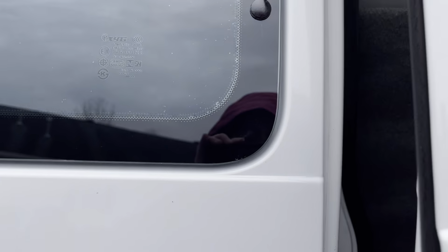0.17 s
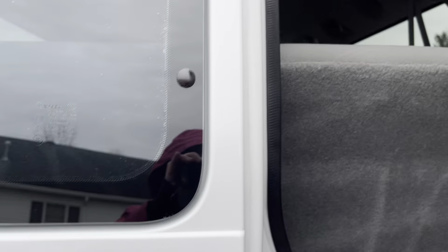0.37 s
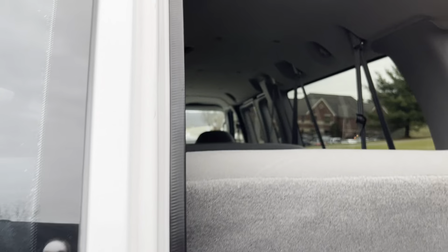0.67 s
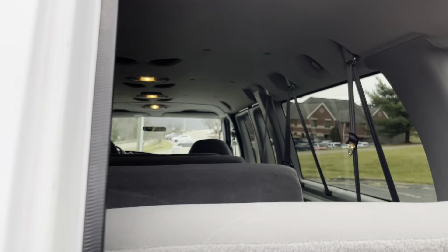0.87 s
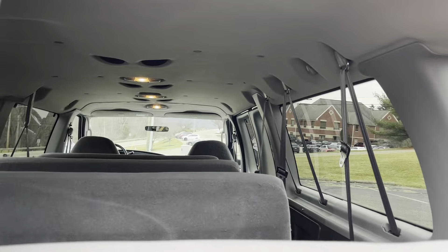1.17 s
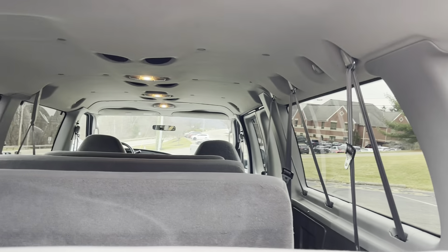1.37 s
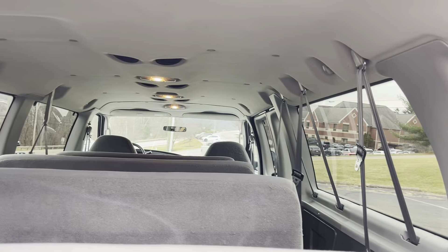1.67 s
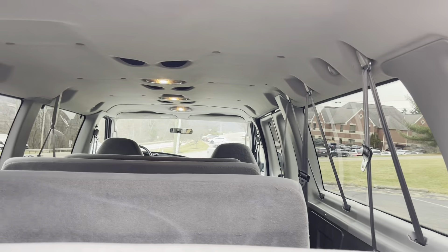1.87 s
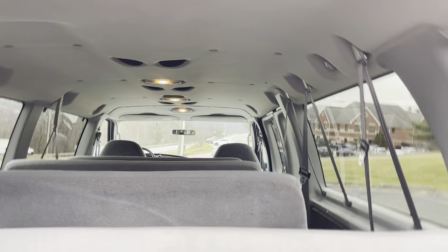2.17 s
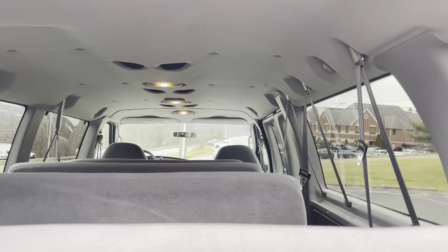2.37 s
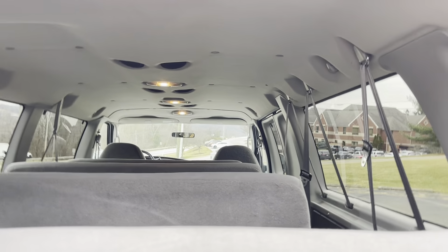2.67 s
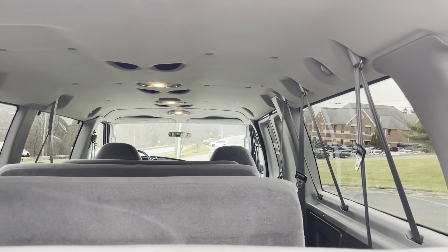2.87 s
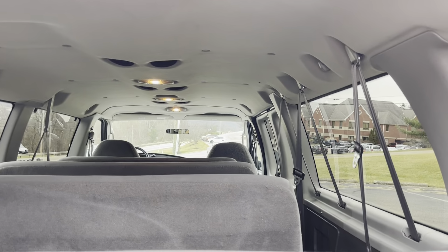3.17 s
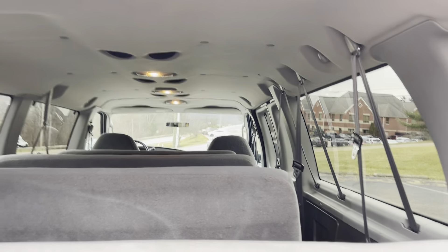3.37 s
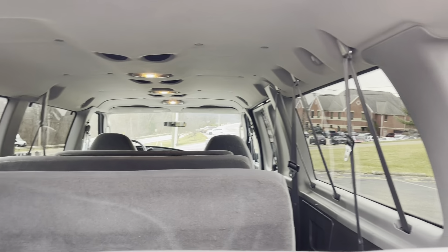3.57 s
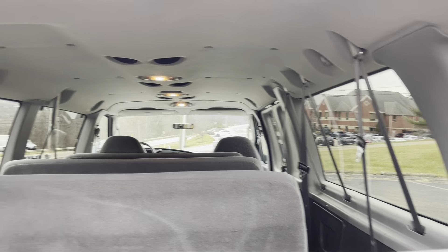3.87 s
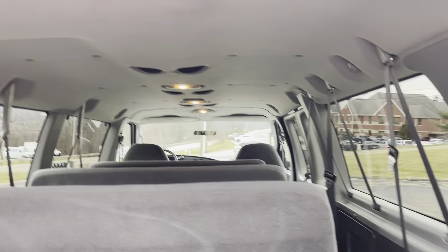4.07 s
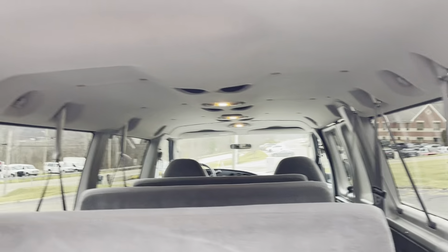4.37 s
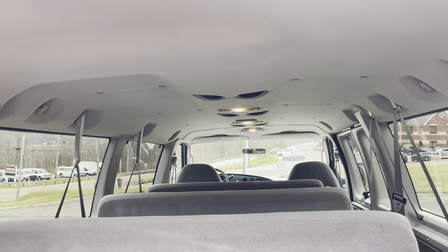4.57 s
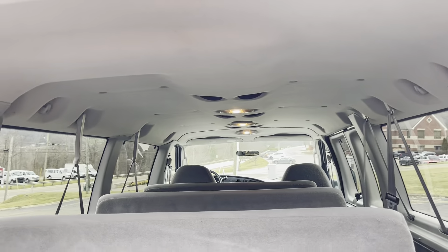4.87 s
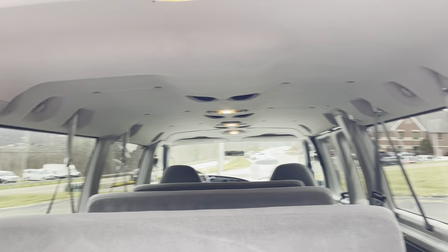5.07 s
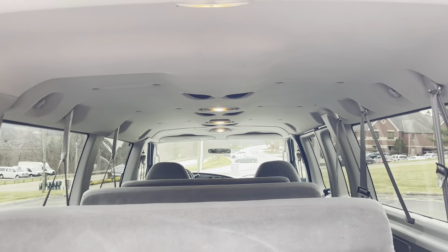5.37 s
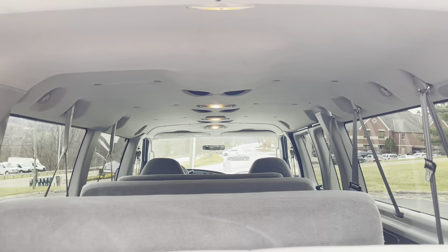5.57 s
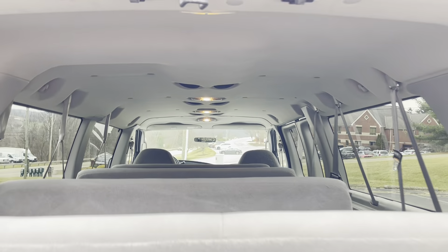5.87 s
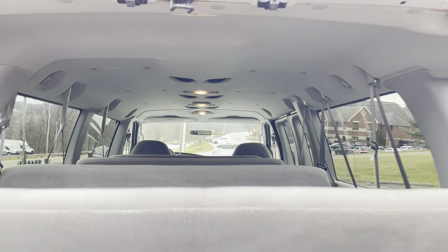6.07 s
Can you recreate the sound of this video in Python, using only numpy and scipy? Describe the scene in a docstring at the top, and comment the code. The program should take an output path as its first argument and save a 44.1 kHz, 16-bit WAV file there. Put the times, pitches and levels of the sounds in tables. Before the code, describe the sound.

A close, hand-held stereo microphone outdoors in a car park. At 0 s a dull knock with a burst of low rumble starts abruptly, over airy hiss and faint traffic. Around 0.5 s a tight cluster of hard latch blows sets the first van door booming and ringing, hollow and heavy. The hiss fades by about 1.2 s; at 1.33 s comes another strong, bright knock with a low thump. Soft scrapes and rubbing follow around 2.0 to 2.4 s, small taps near 2.6 s, and the rumble almost vanishes at 2.95 s. Tiny ticks lead to a knock at 3.3 s and a sharp, bright metallic clack at 3.46 s from the second door. Lighter bumps come near 4.0, 4.4 and 5.1 to 5.3 s, with clothes rustling. From 4.5 s a distant car's tyre hum swells and sinks in pitch, with faint taps to the end at 6.2 s.

```python
"""Two heavy rear doors of a van are unlatched and swung open in a car park, heard by a hand-held microphone pair.
First, knocks and a hard latch set the first door booming and ringing, under an airy hiss and a low rumble.
The rumble is nearly silent around 2.95 s; the second door follows, with a bright latch clack near 3.5 s.
Lighter knocks, thumps and scrapes come after, and from 4.5 s a far car's tyre note grows and sinks.
Clothes rustle and traffic hums behind. Blows are dying sine tones and noise; the rest is mostly shaped noise."""
import sys
import numpy as np
from scipy import signal
from scipy.io import wavfile

SR = 44100
rng = np.random.default_rng(int(sys.argv[2]) if len(sys.argv) > 2 else 0)


def transcribe(signal):
    """Save signal, clipped to [-1, 1], as a 16-bit WAV file at the path in sys.argv[1]."""
    frames = np.atleast_2d(signal).T
    limited = np.clip(frames, -1, 1)
    pcm = np.round(limited * 32767).astype(np.int16)
    wavfile.write(sys.argv[1], SR, pcm)


N = 274875

# Far traffic spectrum: pitch_hz, relative level_db (per Hz)
TRAFFIC_SPECTRUM = [(350, -34.5), (600, -15), (774, -4.5), (1010, -4), (1210, -9), (1620, -2), (2330, -12),
                    (3050, -20), (4000, -15.5), (5200, -53.5), (8800, -120)]
# Far traffic, more or less screened by doors and body: time_s, level_db
TRAFFIC_LEVEL = [(0, -56.5), (.42, -55.5), (1.04, -58.5), (1.4, -60), (1.72, -67), (2.19, -58.5),
                 (2.44, -63), (2.58, -59.5), (2.83, -64), (3.1, -78), (3.45, -64.5), (4, -62), (4.9, -63),
                 (5.4, -59), (6.23, -61)]
# Two humps where tyre roar stands out: pitch_hz, width_hz, added_db
TYRE_HUMPS = [(974, 103, -9), (1720, 170, -14)]
# A far car rolls by: time_s, level_db
CAR_LEVEL = [(4.5, -82.5), (4.8, -61.5), (5.2, -60.5), (5.7, -59), (6.23, -56)]
# Its tyre note coming, then going: pitch_hz, width_hz (of each of two filter passes)
CAR_NOTES = [(1050, 210), (910, 150)]

# Door and grip rumble spectrum: pitch_hz, relative level_db (per Hz)
RUMBLE_SPECTRUM = [(15, -45), (25, -21.5), (49, -1), (103, 0.5), (123, 1.5), (146, -12.5), (331, -20.5),
                   (470, -36), (500, -16), (650, -56), (1100, -120)]
# Low handling rumble of doors and grip, nearly silent around 2.95 s: time_s, level_db
RUMBLE_LEVEL = [(0, -12.5), (.05, -34), (.42, -48.5), (.6, -35), (.7, -39), (.88, -44), (1.04, -41.5),
                (1.37, -47.5), (1.8, -50), (2.2, -45.5), (2.58, -47), (2.83, -52.5), (2.95, -88),
                (3.16, -60), (3.36, -45.5), (3.5, -36.5), (3.8, -49), (4.23, -46), (4.5, -52), (4.94, -52),
                (5.12, -47.5), (5.3, -44), (5.4, -45.5), (5.52, -48.5), (6.23, -49.5)]
# Gain of the deepest rumble, which drops at 4.4 s and partly returns: time_s, gain_db
DEEP_GAIN = [(0, 4.5), (4.3, 1.5), (4.45, -24), (5.0, -13.5), (5.3, -5.5), (5.6, -13), (5.95, -2),
             (6.23, 0.5)]
# Panel murmur spectrum: pitch_hz, relative level_db (per Hz)
MURMUR_SPECTRUM = [(110, -31), (180, -0.5), (270, -4), (456, -11), (491, -13), (771, -16.5), (900, -11),
                   (1170, -50), (1980, -120)]
# Murmur of the panels as a door is moved: top_s, level_db, half_length_s
MURMUR_SWELLS = [(0, -27.5, 0.034), (.36, -48.5, 0.2), (1.04, -42.5, 0.067), (1.57, -44.5, 0.11),
                 (2.12, -52.5, 0.085), (2.58, -59.5, 0.067), (3.53, -42.5, .12), (3.99, -46, 0.16),
                 (4.6, -59, 0.3), (5.22, -57, 0.19)]
# Clothes rustle spectrum: pitch_hz, relative level_db (per Hz)
RUSTLE_SPECTRUM = [(1290, -23), (2200, -4.5), (2500, -13), (3590, -8.5), (6070, -8), (8600, -5), (10400, 2),
                   (11400, -10), (11800, -14), (12200, -60.5), (12900, -59), (16800, -89), (22000, -120)]
# Clothes rustle with each gesture: top_s, level_db, half_length_s
RUSTLE_SWELLS = [(.2, -57, 0.36), (.8, -66, 0.27), (1.51, -74.5, 0.12), (1.85, -73, 0.11),
                 (2.19, -58.5, 0.19), (2.8, -64, 0.42), (3.63, -64, .12), (4.1, -67, 0.48),
                 (4.62, -60, 0.18), (5.22, -70.5, 0.07), (5.52, -68.5, 0.063), (6.07, -71.5, 0.21)]
RUSTLE_REST_DB = -75
# Stereo width of the background: pitch_hz, side_minus_mid_db
BACKGROUND_WIDTH = [(60, -8.5), (110, -14), (200, -9), (360, -3), (640, 2), (1160, 5), (2110, -1.5),
                    (3810, -1), (6890, -3.5), (12500, -7)]

# Airy hiss of the swinging first door: time_s, level_db
SWING_HISS_LEVEL = [(0.0, -49), (0.068, -50), (0.224, -59.5), (0.748, -59.5), (1.024, -67), (1.158, -76),
                    (1.3, -82)]
SWING_HZ, SWING_WIDTH_HZ = 1950, 300   # width of each of two filter passes
# Scrapes of strap, seal and sleeve, and a buzzing trim:
# start_s, length_s, pitch_hz, width_hz (of each of two filter passes), level_db
SCRAPES = [(0.833, 0.13, 5950, 2550, -56.5), (1.536, 0.14, 1900, 1540, -58), (2.042, 0.23, 620, 300, -53),
           (2.08, 0.088, 2850, 500, -50), (2.178, 0.21, 2250, 1500, -56.5), (2.467, 0.067, 764, 300, -54),
           (2.723, 0.031, 2160, 1194, -56), (3.472, 0.11, 8960, 804, -56), (3.991, 0.042, 1920, 2470, -52),
           (4.638, 0.025, 1683, 860, -52), (5.263, 0.06, 756, 490, -46.5), (5.357, 0.019, 6940, 4000, -61),
           (5.385, 0.01, 6600, 905, -64)]
# Soft thumps of hand and door weight: start_s, pitch_hz, level_db, length_ms
THUMPS = [(0.444, 63.5, -25.5, 32), (0.856, 75, -27.5, 33), (1.385, 175, -18, 18.6), (1.422, 130, -26, 28),
          (1.47, 119, -23.5, 11), (2.234, 76.5, -30, 44), (2.262, 92, -33, 75), (2.32, 61.4, -30, 75),
          (3.412, 262, -34.5, 24), (3.88, 67.3, -36, 43), (4.277, 115, -28.5, 23), (4.39, 97, -27.5, 24),
          (5.039, 127, -45, 110), (5.117, 109, -28.5, 35), (5.151, 147, -29.5, 44), (5.215, 107, -34, 37),
          (5.524, 161, -40, 42)]

# Knocks on the doors: start_s, body_db (at 850 Hz), hardness_db_per_octave, boom_db, boom_hz,
# note_db (of the struck part), note_hz, ring_length_factor
KNOCKS = [(0.001, -22, -6, -20.5, 66.6, -27, 793, 1), (0.056, -32.5, -5.5, -36, 198.4, -27, 616, 1),
          (0.388, -39.5, -8, -40, 268, -43, 624, 0.44), (0.497, -25.5, -0.5, -36, 61, -21, 1180, 1),
          (0.506, -15.5, 1.5, -35, 196, -15, 990, 0.81), (0.511, -13, 1, -21, 191, -9, 765, 0.83),
          (0.518, -10.5, -3, -4, 155, -8, 790, 0.49), (0.531, -20, -0.5, -9.5, 122.4, -19, 600, 1),
          (0.655, -40.5, -4.5, -31, 175, -42, 726, 0.79), (0.843, -39.5, -6.5, -36, 101, -32, 620, 0.97),
          (0.903, -39.5, -4, -43, 233, -32, 705, 0.86), (1.118, -45.5, -8, -29.5, 171, -35, 830, 1),
          (1.154, -39, -8, -27, 97.5, -51, 593, 0.48), (1.333, -10.5, 0.95, -11.5, 160.5, -14, 990, 0.56),
          (1.341, -21, -10, -26, 205, -7, 512, 0.38), (1.367, -27.5, -6.5, -22.5, 179, -27, 537, 0.59),
          (1.404, -34.5, -5.5, -21.5, 124, -40, 725, 0.86), (2.037, -53, -9, -43, 81.5, -44, 615, 0.82),
          (2.096, -54.5, 4, -59, 128, -49, 540, .98), (2.159, -41, -3, -74, 105, -38, 586, 0.48),
          (2.577, -44, -0.5, -29, 120, -34, 515, 0.36), (2.619, -38, 1.5, -19.5, 264, -11.5, 820, 0.21),
          (2.631, -49, 2.5, -27, 72, -26, 730, 0.31), (2.709, -57.5, 1, -45, 93.5, -51, 756, .97),
          (3.07, -62, 4.5, -59.5, 254, -37.5, 2400, 1), (3.196, -55.5, 1.5, -37.5, 64.6, -45, 1760, .56),
          (3.257, -53, 4.5, -48, 72.7, -31, 3420, 0.79), (3.285, -56.5, 10, -51, 56.5, -36, 3140, 0.41),
          (3.296, -33, 2.5, -22, 262, -22, 770, 0.48), (3.443, -34.5, 2.9, -22, 225, -31, 700, .83),
          (3.455, -9.5, 0.5, -46, 256, 2.5, 3080, 0.66), (3.465, -23, -7, -52.5, 116, -10, 613.5, 0.91),
          (3.979, -43, 0, -41, 174, -37, 664, 1), (4.023, -34.5, 1, -27, 156, -28, 560, 0.65),
          (4.121, -51, -4, -46, 85, -41, 645, 0.89), (4.354, -45, -9, -20, 153, -37, 500, 0.52),
          (4.376, -48, -5.5, -18.5, 167, -39.5, 510, 0.57), (4.636, -44.5, -5, -37, 118, -38.5, 670, 1),
          (4.943, -51.5, -3.5, -39, 233, -52, 1136, .62), (5.094, -33.5, -8, -20.5, 221, -21.5, 501, 0.54),
          (5.106, -32.5, -6, -20, 112.4, -26.5, 576, 0.64), (5.243, -42, -4, -36, 258, -33, 584, 0.91),
          (5.292, -41.5, -5.5, -25.5, 144, -30, 510, 0.66), (5.558, -52, -0.6, -35, 177, -59, 1080, 1),
          (5.819, -49.5, -8, -71.5, 113.5, -48.5, 1020, 0.74), (6.024, -51, 0, -46, 99, -25.5, 1650, 0.41),
          (6.195, -53.5, 1.6, -52, 104, -46, 850, 0.91)]
# Centres of boom, thud, clunk, clack and click: pitch_hz
PARTS_HZ = [100, 320, 850, 2400, 7000]
# Thud, clunk, clack and click of a knock of hardness 0, against its body: level_db
KNOCK_COLOUR = [-0.95, 2, 0.56, -1.7]
# Distinct ringing tones (modes) of each door: pitch_hz, relative level_db, time_to_fall_60_db_s
FIRST_DOOR = [(71.5, -7.5, 0.12), (143, -8, 0.7), (173.5, -3, 0.31), (208.4, -2, 0.28), (244.4, -6.5, 0.3),
              (332, -0.5, 0.11), (333.4, -5.5, 0.18), (423.5, -8, 0.39), (527, -19.5, 0.23),
              (602, -15, 0.29), (811, -10.5, .45), (865, -16.5, 0.56), (1144, -9, 0.056),
              (1220, -11.5, 0.15), (1640, -23, .1), (1877, -14, 0.21), (2060, -7, .1), (2220, -21.5, .1),
              (2640, -32.5, 0.092), (4740, -11.5, .08), (5780, -19, 0.12)]
SECOND_DOOR = [(73.7, -11.5, 0.17), (207.8, -8.5, 0.37), (249, -3, 0.29), (360.2, -3, .35),
               (428.7, -19, 0.84), (618.6, -3, 0.18), (736, -21.5, .2), (906, -25, .15), (1123, -8, 0.08),
               (1270, -21, 0.14), (1776, -2, 0.052), (2082, 1.5, 0.067), (3207, -12.5, 0.047),
               (3460, -1.5, 0.036), (3710, -8, 0.092)]
SECOND_DOOR_FROM_S = 2.9
# Crowded modes of the panels, heard as dying noise: pitch_hz, relative level_db, time_to_fall_60_db_s
PANELS = [(45, -19.5, 0.25), (90, -13, 0.14), (185, 1.5, 0.22), (401, -3.5, 0.27), (970, 1, 0.12),
          (2530, -1.5, 0.064), (5000, -0.5, 0.048), (8900, 3.5, 0.036), (11760, -1.5, 0.036)]
# Share of panel noise that differs between the channels: pitch_hz, level_db
KNOCK_WIDTH = [(60, -11), (300, -16), (1000, -3.5), (3000, -1), (8000, -5.5), (12000, -2)]
# Left and right balance of the knocks: pitch_hz, left_minus_right_db
KNOCK_BALANCE = [(60, 1.5), (110, 3), (200, 3), (360, 4), (640, 2.5), (1160, 5.5), (2110, 5), (3810, 7),
                 (6890, 7.5), (12500, -5.5)]
# Where the worked door is: time_s, left_delay_ms (against the right), left_minus_right_db
BEARING = [(0, -0.05, -1.5), (.45, 0.4, -2), (2.7, 0.23, -1.7), (3.2, -0.24, -1.9), (4.5, -0.53, -0.5),
           (6.23, -0.39, -6)]
CONTACT_MS = 1.3
# A strong hard blow is a latch snap: its mids stand out because thud and click are cut.
# Cut in dB per dB of strength above SNAP_FROM_DB, times a hardness weight of 0 to 2
SNAP_FROM_DB, SNAP_THUD_CUT, SNAP_CLICK_CUT = -31, .25, 0.13

PORT_NOTCH_HZ, PORT_NOTCH_WIDTH_HZ = 10100, 830
LOW_CUT_HZ, CUTOFF_HZ = 42.2, 13200
# Edges of half-octave noise bands, in Hz
EDGES = 28 * 2 ** np.arange(0, 9.1, .5)


def amp(db):
    """Turn decibels into a gain."""
    return 10 ** (np.asarray(db) / 20)


def rms_one(x):
    """Scale a sound to an average (rms) strength of 1."""
    return x / np.sqrt(np.mean(x ** 2) + 1e-20)


def in_time(rows, s):
    """Read the columns of a time curve at times s."""
    at, *columns = np.transpose(rows)
    return [np.interp(s, at, column) for column in columns]


def at_hz(points, hz, axis=1):
    """Read a spectrum column, with pitch spaced by octaves as we hear it."""
    points = np.array(points)
    return np.interp(np.log(hz), np.log(points[:, 0]), points[:, axis])


def drift(rate):
    """Wander slowly by chance, with spread 1: smoothed noise, faster for a higher rate."""
    r = np.exp(-80 * np.pi * rate / SR)
    noise = rng.standard_normal(N // 40 + 2002)   # one value per 40 samples
    slow = signal.lfilter([1], [1, -2 * r, r * r], noise)[2000:]
    return np.interp(np.arange(N) / 40, np.arange(len(slow)), rms_one(slow))


def noise_bands():
    """Split unrelated noise pairs into half-octave bands of equal power per Hz; give centres and bands."""
    white = rng.standard_normal((2, 2, N + 4000))
    bands = []
    for k, (low, high) in enumerate(zip(EDGES, EDGES[1:])):
        band_filter = signal.butter(2, [low, high], "band", fs=SR, output="sos")
        # neighbouring bands use different noise
        bands.append(signal.sosfilt(band_filter, white[k % 2])[:, 4000:])
    return np.sqrt(EDGES[:-1] * EDGES[1:]), bands


def resonate_twice(x, hz, width_hz):
    """Pass a sound twice through one resonance, which favours pitches near hz."""
    peak = signal.iirpeak(hz, hz / width_hz, SR)
    return signal.lfilter(*peak, signal.lfilter(*peak, x))


def background(spectrum, level_db, patchy_db, flicker_rate):
    """Make patchy stereo noise whose bands swell partly together and partly alone."""
    out, together = 0, drift(flicker_rate)
    for hz, (mid, side) in zip(*noise_bands()):
        if spectrum[0][0] < hz < spectrum[-1][0]:
            flicker_db = patchy_db * (0.9 * together + drift(flicker_rate))
            gain = amp(at_hz(spectrum, hz) + flicker_db)
            out = out + gain * (mid + amp(at_hz(BACKGROUND_WIDTH, hz)) * side * [[1], [-1]])
    return amp(level_db) * out / np.sqrt(np.mean(out.mean(axis=0) ** 2))


def swells(rows, rest_db):
    """Give levels in dB: a rest level plus rounded swells, each 12 dB down a half length from its top."""
    t = np.arange(N) / SR
    tops = sum(amp(db - 12 * ((t - s) / half_s) ** 2) for s, db, half_s in rows)
    return 20 * np.log10(amp(rest_db) + tops)


def traffic_level_db():
    """Read the far traffic level over time."""
    return in_time(TRAFFIC_LEVEL, np.arange(N) / SR)[0]


def far_traffic():
    """Far traffic is wide noise, with two humps where tyre roar stands out."""
    roar = background(TRAFFIC_SPECTRUM, traffic_level_db(), patchy_db=2.16, flicker_rate=7.1)
    humps = sum(amp(db) * signal.lfilter(*signal.iirpeak(hz, hz / width_hz, SR), roar)
                for hz, width_hz, db in TYRE_HUMPS)
    return roar + humps


def passing_car():
    """Tyre noise sinks in pitch as a higher narrow band gives way to a lower one."""
    t = np.arange(N) / SR
    coming, going = [rms_one(resonate_twice(rng.standard_normal((2, N)), hz, width_hz))
                     for hz, width_hz in CAR_NOTES]
    passed = np.clip((t - 5.2) / 1.23, 0, 1)
    level_db, = in_time(CAR_LEVEL, t)
    return amp(level_db) * (np.sqrt(1 - passed) * coming + np.sqrt(passed) * going)


def handling_rumble():
    """Doors and grip rumble as low noise, whose deepest part has a gain curve of its own."""
    t = np.arange(N) / SR
    level_db, = in_time(RUMBLE_LEVEL, t)
    rumble = background(RUMBLE_SPECTRUM, level_db, patchy_db=2.3, flicker_rate=14.0)
    deep = signal.sosfiltfilt(signal.butter(2, 62.0, fs=SR, output="sos"), rumble)
    deep_gain_db, = in_time(DEEP_GAIN, t)
    return rumble + (amp(deep_gain_db) - 1) * deep


def panel_murmur():
    """Moved panels murmur as noise that swells above a rest level equal to the traffic's."""
    level_db = swells(MURMUR_SWELLS, traffic_level_db())
    return background(MURMUR_SPECTRUM, level_db, patchy_db=2.0, flicker_rate=35.0)


def clothes_rustle():
    """Rubbing cloth makes bright, flickering noise that swells with each gesture."""
    level_db = swells(RUSTLE_SWELLS, RUSTLE_REST_DB)
    return background(RUSTLE_SPECTRUM, level_db, patchy_db=1.23, flicker_rate=21.0)


def swing_hiss():
    """The swinging door hisses: air noise passed twice through one resonance."""
    air = resonate_twice(rng.standard_normal((2, N)), SWING_HZ, SWING_WIDTH_HZ)
    level_db, = in_time(SWING_HISS_LEVEL + [(1.7, -100)], np.arange(N) / SR)
    # each channel also hears some of the other
    return amp(level_db + 1.5 * drift(18.0)) * rms_one(air + 0.54 * air[::-1])


def scrapes(grains_per_s=3500.0):
    """Rubbing makes many uneven grains, coloured by one resonance; it starts fast and fades slower."""
    out = np.zeros((2, N))
    grains = (rng.random((2, N)) < grains_per_s / SR) * rng.standard_normal((2, N)) + 1e-18
    for s, length_s, hz, width_hz, level_db in SCRAPES:
        at, size = round(s * SR), round(length_s * SR)
        rubbed = resonate_twice(grains[:, at:at + size], hz, width_hz)
        stroke = np.sin(np.pi * np.linspace(0, 1, size) ** 0.55)
        out[:, at:at + size] += amp(level_db) * stroke * rms_one(rubbed + 0.23 * rubbed[::-1])
    return out * amp([[1.2], [-1.2]])   # dB, left and right


def thumps():
    """Soft weight gives a few low cycles that swell and fade, stronger on the left."""
    out = np.zeros(N)
    for s, hz, level_db, length_ms in THUMPS:
        t = np.arange(int(length_ms / 1000 * SR)) / SR
        swell = np.sin(np.pi * (t / t[-1]) ** 0.63) ** 1.9
        out[round(s * SR):][:len(t)] += amp(level_db) * swell * np.sin(2 * np.pi * hz * t)
    return out * amp([[1.6], [-1.6]])   # dB, left and right


def struck(t, hz, t60, contact_ms, tail_db=-20.0):
    """A blow builds over the contact and a share of a cycle, drops fast, and leaves a fainter, longer tail."""
    rise = 1 - np.exp(-t / (max(contact_ms, .05) / 1000 + 0.2 / hz))
    return rise * (amp(-60 * t / t60) + amp(tail_db - 60 * t / (4.6 * t60)))


def knock_colour(body_db, hardness, low_db):
    """A harder blow is brighter; give the level of each part from boom to click."""
    octaves = np.log2(np.array(PARTS_HZ[1:]) / PARTS_HZ[2])
    upper_db = body_db + hardness * octaves + KNOCK_COLOUR
    snap_db = max(body_db - SNAP_FROM_DB, 0) * np.clip(hardness + 2, 0, 2)
    upper_db = upper_db - snap_db * np.array([SNAP_THUD_CUT, 0, 0, SNAP_CLICK_CUT])
    return list(zip(PARTS_HZ, [low_db, *upper_db]))


def knocks(modes_db=-1.75, panels_db=-8.0, boom_db=-2.5, boom_cycles=23.0, note_cycles=35.0, shake=0.18):
    """Each knock rings its own boom and note, the door's modes and the panels; lows reach the ports apart in time."""
    size = SR * 3 // 5
    t, out = np.arange(size) / SR, np.zeros((2, N + size))
    centres, bands = noise_bands()
    bands = [rms_one(b) for b in bands]
    chance = rng.random((len(KNOCKS), len(FIRST_DOOR) + 1))
    for (s, body_db, hardness, low_db, boom_hz, note_db, note_hz, ring), draw in zip(KNOCKS, chance):
        colour = knock_colour(body_db, hardness, low_db)
        ring = np.clip(ring, .1, 3)
        door = FIRST_DOOR if s < SECOND_DOOR_FROM_S else SECOND_DOOR
        # heavy blows shake the whole door, light taps mostly the part they touch
        shaken_db = modes_db + shake * body_db
        modes = [(hz, shaken_db + at_hz(colour, hz) + db + 4 * (strength - .5), t60)
                 for (hz, db, t60), strength in zip(door, draw[1:])]
        modes += [(boom_hz, low_db + boom_db, boom_cycles / boom_hz),
                  (note_hz, note_db, note_cycles / note_hz)]
        parts = []   # pitch, sound alike in both channels, sound unlike
        for k, (hz, db, t60) in enumerate(modes):
            envelope = struck(t, hz, ring * t60, CONTACT_MS, tail_db=-26.0)
            # neighbouring modes start in opposite sense
            tone = amp(db) * envelope * np.sin(2 * np.pi * hz * t) * (-1) ** k
            parts.append((hz, tone, 0))
        start = int(draw[0] * (N - size))
        for hz, band in zip(centres, bands):
            level = amp(panels_db + at_hz(colour, hz) + at_hz(PANELS, hz))
            envelope = struck(t, hz, ring * at_hz(PANELS, hz, axis=2), CONTACT_MS)
            alike, unalike = level * envelope * band[:, start:start + size]
            parts.append((hz, alike, unalike * amp(at_hz(KNOCK_WIDTH, hz))))
        late_ms, pan_db = in_time(BEARING, s)
        for hz, alike, unalike in parts:
            balance_db = pan_db + at_hz(KNOCK_BALANCE, hz)
            for channel, side in enumerate((1, -1)):
                # the housing scatters short waves to both ports
                late_s = side * late_ms / 2000 * (hz < 3500)
                at = max(round((s + late_s) * SR), 0)
                out[channel, at:at + size] += amp(side * balance_db / 2) * (alike + side * unalike)
    return out[:, :N]


def scene():
    """Add the sounds, from the background to the knocks."""
    behind = far_traffic() + handling_rumble() + panel_murmur() + clothes_rustle()
    behind = behind * amp([[.7], [-.7]])   # dB, left and right
    return behind + passing_car() + swing_hiss() + scrapes() + thumps() + knocks()


def record(dry):
    """The ports cancel in their sum at one high pitch; deepest bass is cut, peaks are rounded and the top is cut."""
    mid, side = (dry[0] + dry[1]) / 2, (dry[0] - dry[1]) / 2
    mid = signal.lfilter(*signal.iirnotch(PORT_NOTCH_HZ, PORT_NOTCH_HZ / PORT_NOTCH_WIDTH_HZ, SR), mid)
    # at that pitch the ports add up in their difference
    side = side + amp(8.5) * signal.lfilter(*signal.iirpeak(PORT_NOTCH_HZ, 14.0, SR), side)
    side = signal.sosfilt(signal.butter(6, 11200.0, fs=SR, output="sos"), side)
    low_cut = signal.butter(4, LOW_CUT_HZ, "high", fs=SR, output="sos")
    mid, side = signal.sosfilt(low_cut, [mid, side])
    rounded = 0.93 * np.tanh(np.array([mid + side, mid - side]) / 0.93)
    return signal.sosfilt(signal.cheby2(12, 70, CUTOFF_HZ, fs=SR, output="sos"), rounded)


dry = scene()
out = record(dry)
transcribe(out)
```